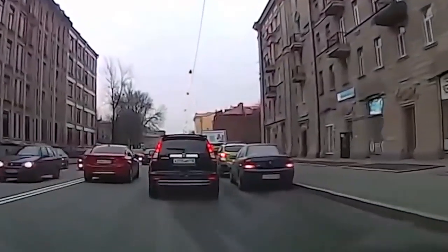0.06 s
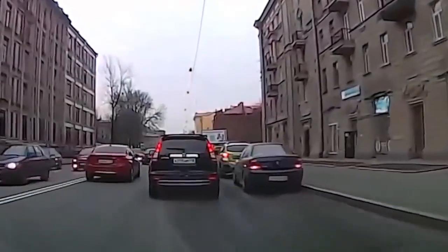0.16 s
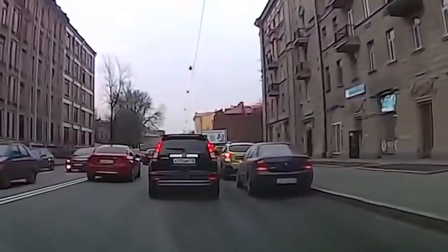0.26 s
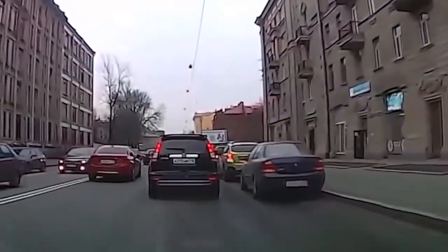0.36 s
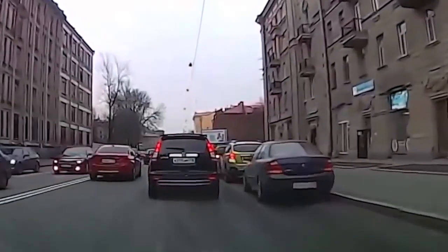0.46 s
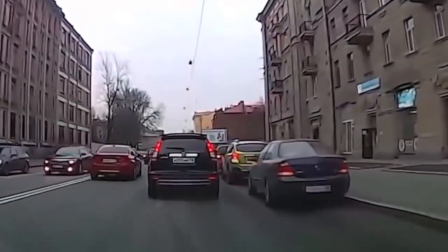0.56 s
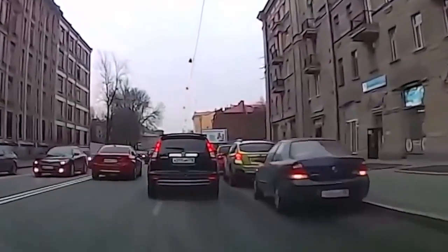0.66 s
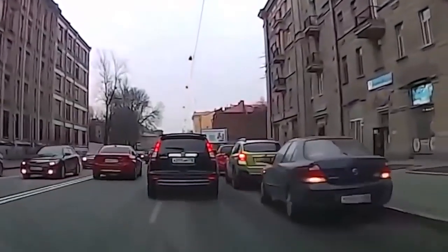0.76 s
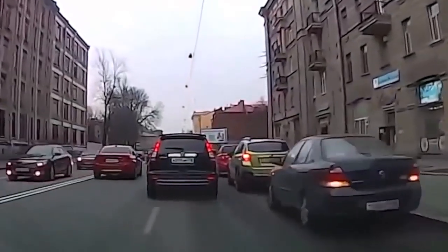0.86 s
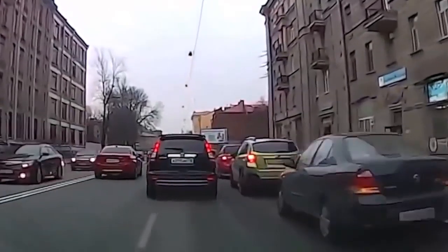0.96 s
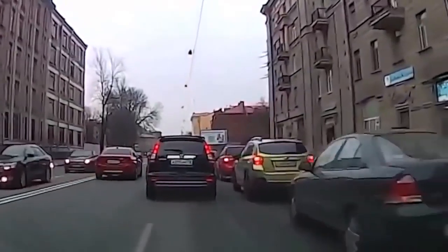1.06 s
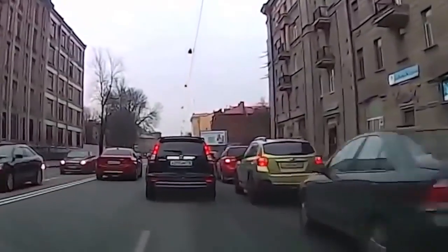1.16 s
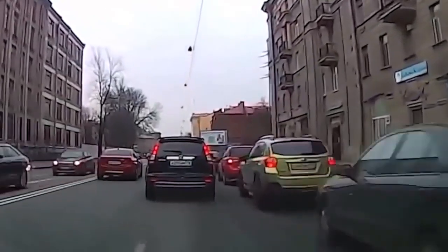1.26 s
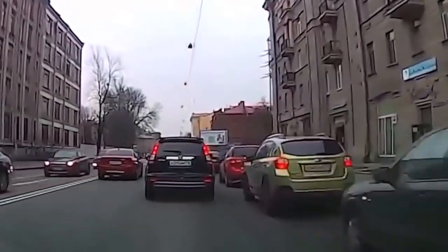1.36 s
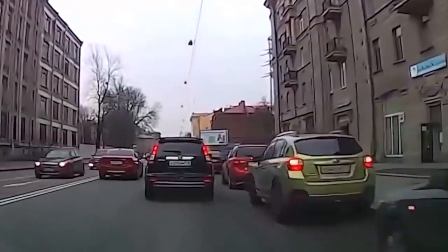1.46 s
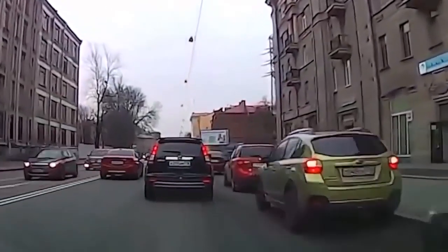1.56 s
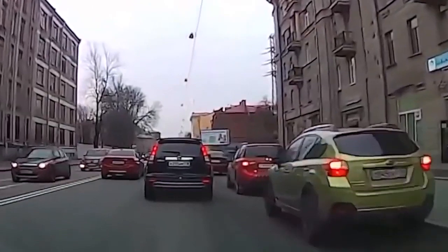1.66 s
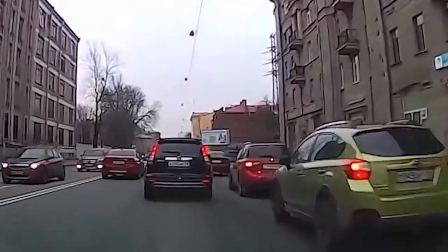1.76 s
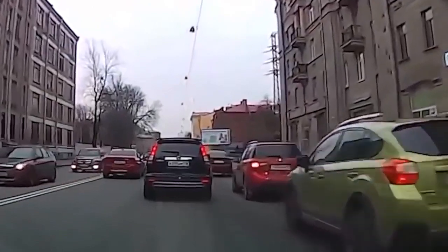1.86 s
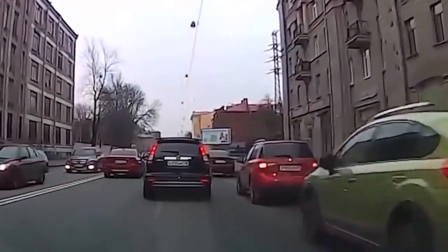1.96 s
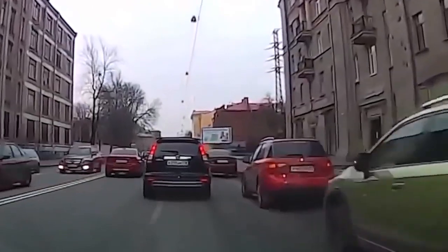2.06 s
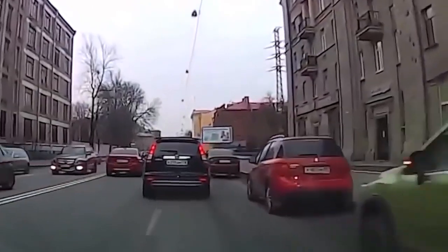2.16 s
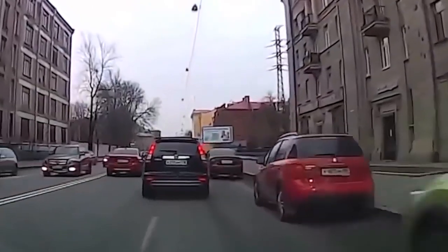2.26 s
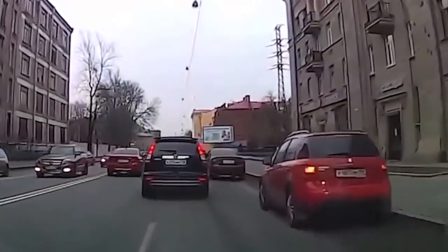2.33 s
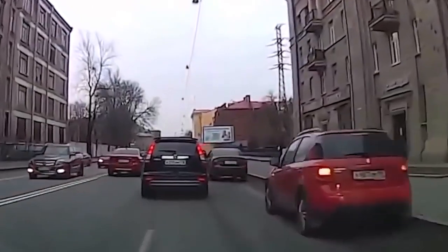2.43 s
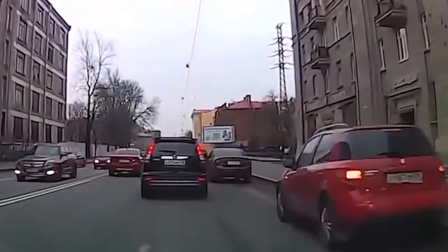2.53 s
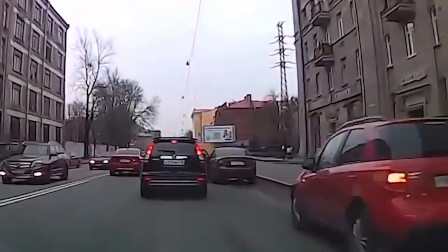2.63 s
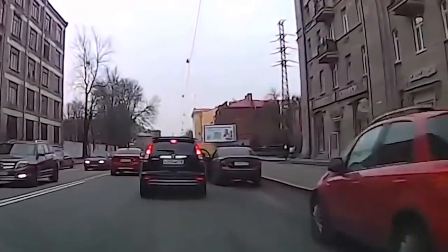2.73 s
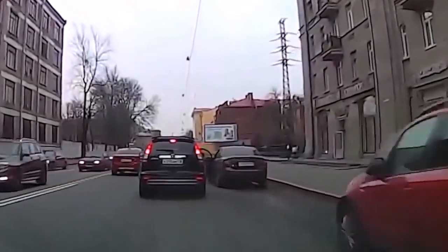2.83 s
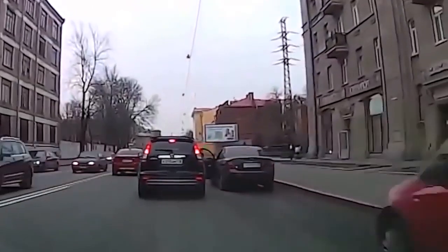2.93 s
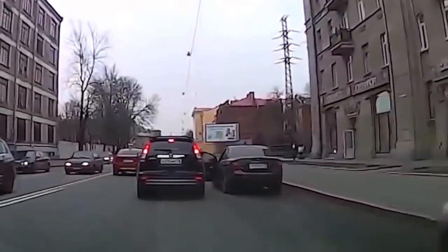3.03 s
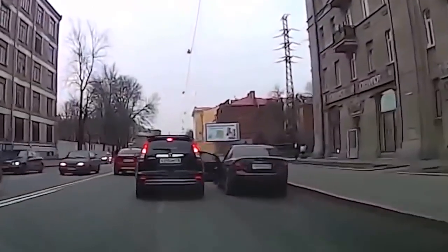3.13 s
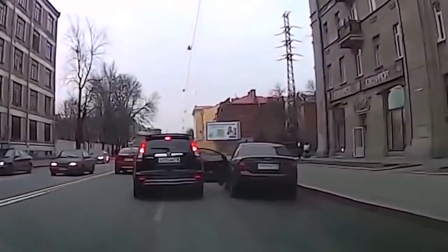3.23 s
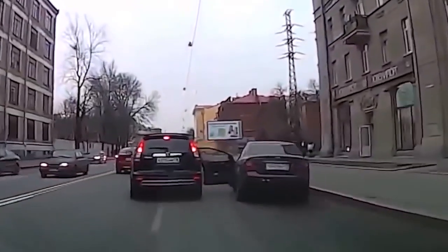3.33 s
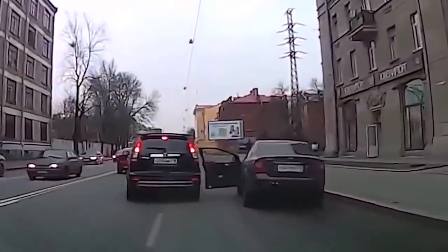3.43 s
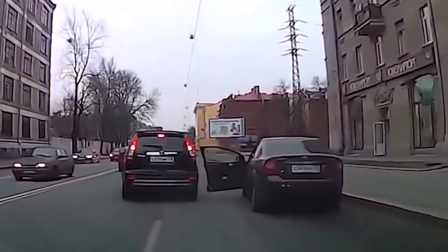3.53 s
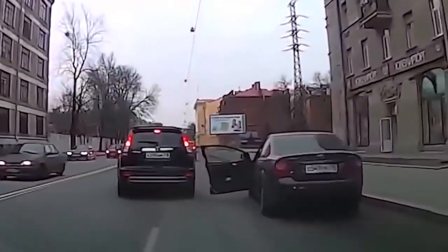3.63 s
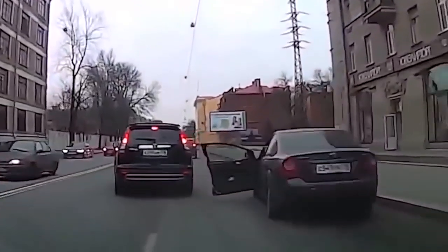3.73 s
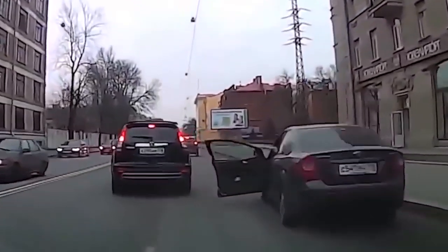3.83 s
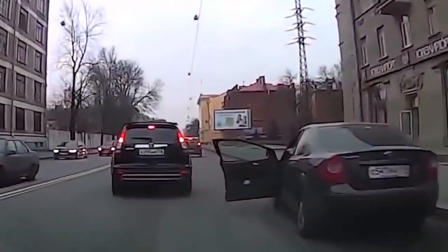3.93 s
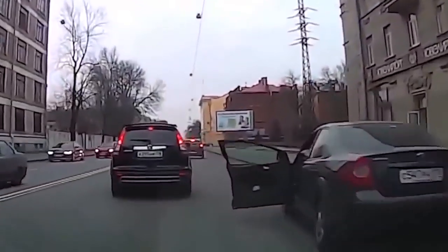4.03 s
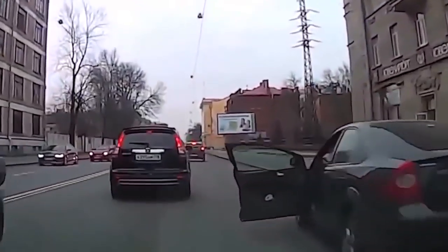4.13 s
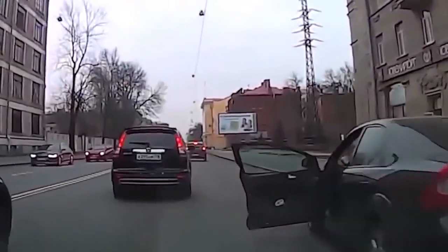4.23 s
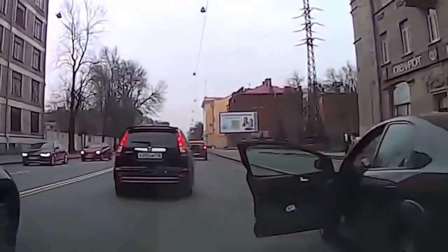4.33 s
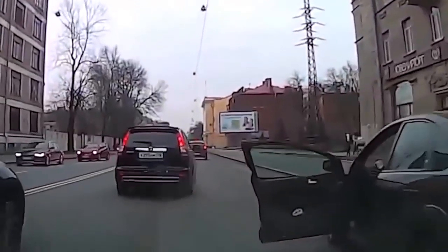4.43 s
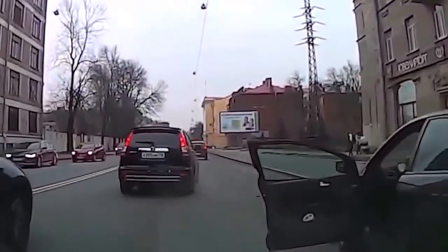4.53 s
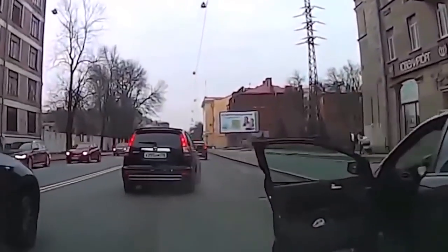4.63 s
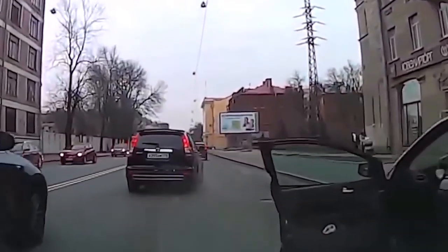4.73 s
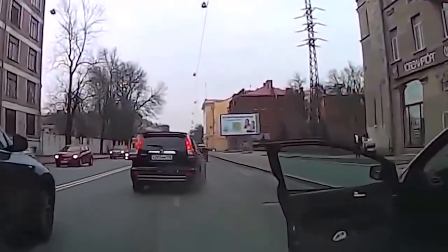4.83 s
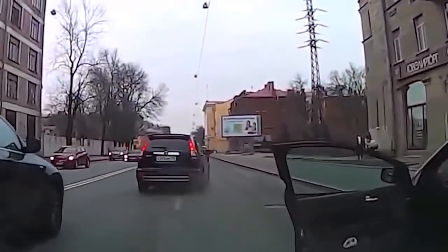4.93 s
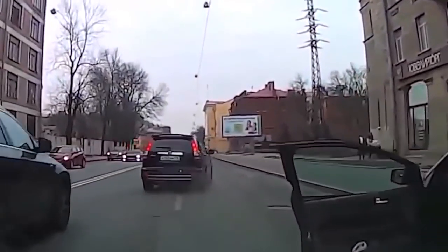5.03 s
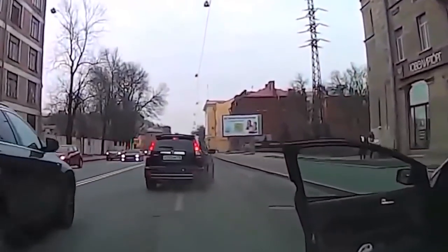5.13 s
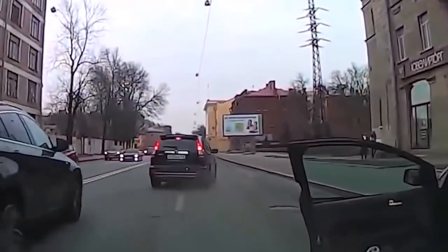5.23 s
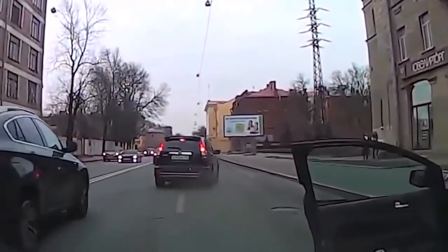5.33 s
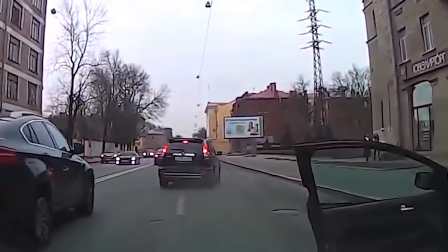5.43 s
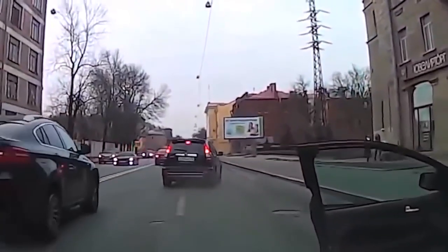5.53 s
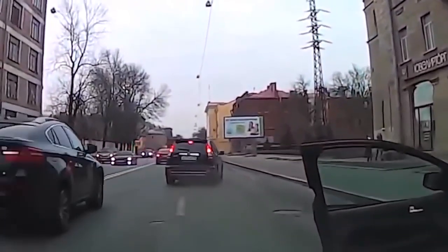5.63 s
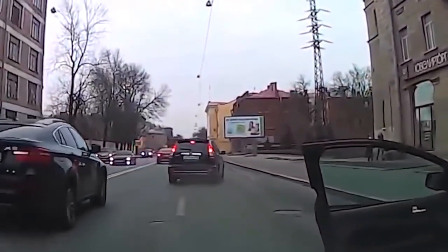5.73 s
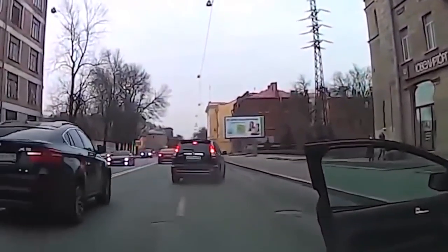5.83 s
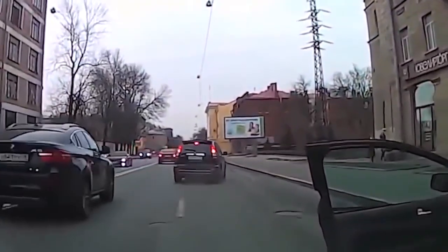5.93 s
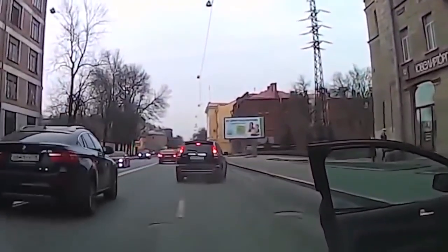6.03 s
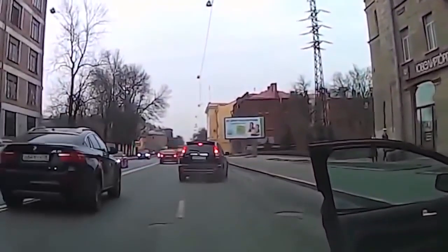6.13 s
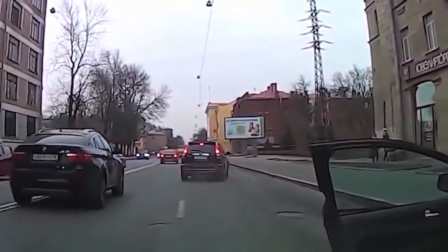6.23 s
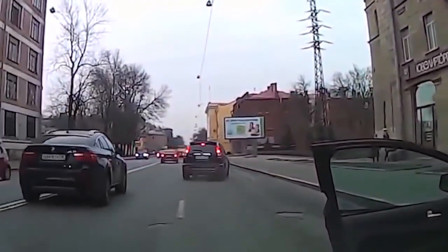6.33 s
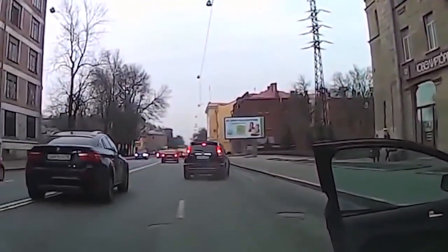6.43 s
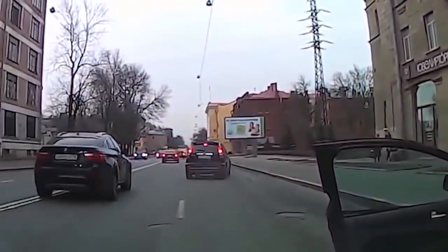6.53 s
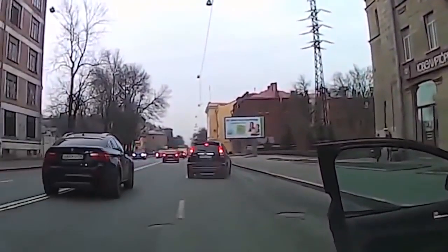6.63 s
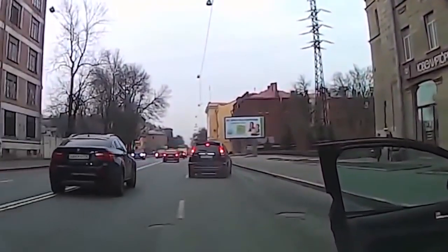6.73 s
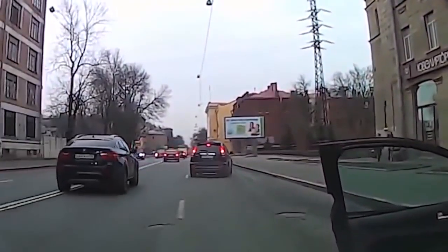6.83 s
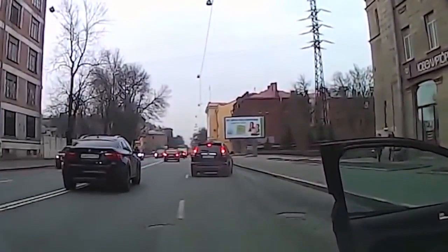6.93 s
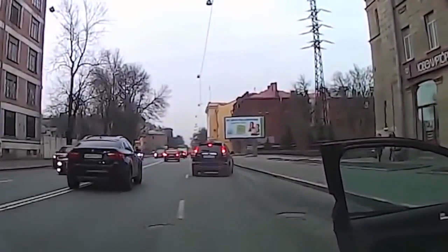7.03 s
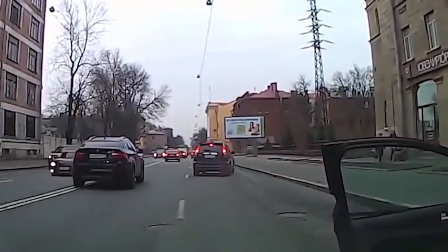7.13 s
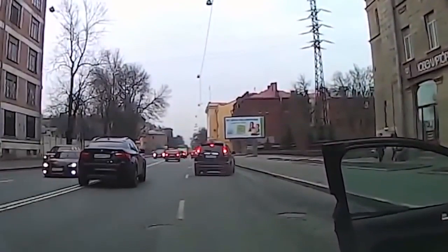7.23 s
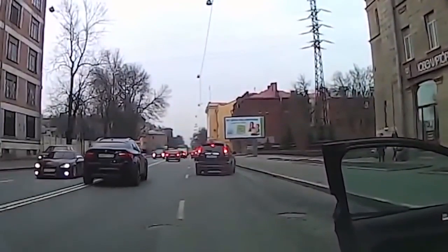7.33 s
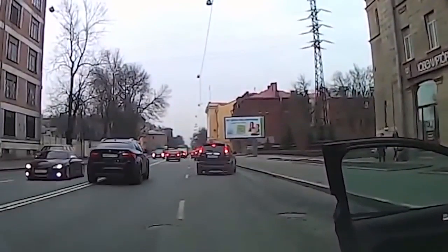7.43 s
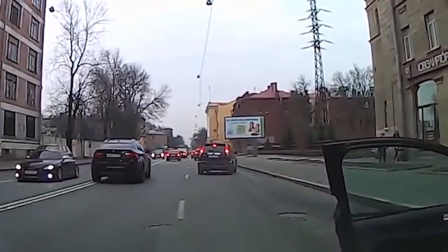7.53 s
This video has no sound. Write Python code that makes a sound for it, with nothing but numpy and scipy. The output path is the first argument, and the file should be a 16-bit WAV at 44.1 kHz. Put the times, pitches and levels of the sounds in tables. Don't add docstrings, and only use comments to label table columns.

```python
import sys
import numpy as np
from scipy import signal
from scipy.io import wavfile
from scipy.ndimage import uniform_filter1d

SR = 44100
rng = np.random.default_rng(int(sys.argv[2]) if len(sys.argv) > 2 else 0)


def store_wav(level_fs):
    pcm = np.round(np.clip(np.atleast_2d(level_fs), -1, 1) * 32767)
    wavfile.write(sys.argv[1], SR, pcm.T.astype(np.int16))


def level_to_linear(level):
    exponent = np.asarray(level, float) / 20
    return 10 ** exponent


N = 334133

# f/Hz, width/Hz, level/dB
PLASTIC = [(312, 130, 5), (561, 53, 6.5), (687, 65, -5.5), (920, 82, -4), (1163, 96, -8.5), (1553, 180, -2),
           (1860, 460, -11.5), (2836, 270, -12), (3340, 85, -17), (3920, 430, -37)]
# f/Hz, width/Hz, level/dB
CLIPS = [(4090, 430, 3.5), (5320, 1600, 2.5), (6110, 2100, -3.5), (8050, 580, -8.5)]


def rms_one(x):
    return x / np.sqrt(np.mean(x ** 2) + 1e-20)


def in_time(rows):
    s, *columns = np.transpose(rows)
    return [np.interp(np.arange(N) / SR, s, c) for c in columns]


def while_on(rows, fade=0.0087):
    t = np.arange(N) / SR
    return np.clip(np.minimum(t - rows[0][0], rows[-1][0] - t) / fade, 0, 1)


def drift(rate):
    r = np.exp(-80 * np.pi * rate / SR)
    chance = rng.standard_normal(N // 40 + 2002)
    slow = signal.lfilter([1], [1, -2 * r, r * r], chance)[2000:]
    return np.interp(np.arange(N) / 40, np.arange(len(slow)), rms_one(slow))


def lowpass(x, order, hz):
    return signal.sosfilt(signal.butter(order, hz, fs=SR, output="sos"), x)


def bandpass(x, order, low_hz, high_hz):
    return signal.sosfilt(signal.butter(order, [low_hz, high_hz], "band", fs=SR, output="sos"), x)


def resonate(x, hz, width_hz):
    r = np.exp(-np.pi * width_hz / SR)
    top = np.array([1, 0, -1]) * (1 - r * r) / 2
    return signal.lfilter(top, [1, -2 * r * np.cos(2 * np.pi * hz / SR), r * r], x)


def body(x, modes, widen=0.89):
    return [level_to_linear(db) * (-1) ** k * resonate(resonate(x, hz, widen * w), hz, widen * w) / np.sqrt(w)
            for k, (hz, w, db) in enumerate(modes)]


def bands(spectrum, patchy_db, step):
    hz, db = np.transpose(spectrum)
    edges = hz[0] * 2 ** np.arange(0, np.log2(hz[-1] / hz[0]), step)
    white, together = rng.standard_normal((2, N)), drift(14)
    for k, (low, high) in enumerate(zip(edges, edges[1:])):
        mid = np.sqrt(low * high)
        level_db = np.interp(np.log(mid), np.log(hz), db)
        gain = level_to_linear(level_db + patchy_db * (1.04 * together + drift(11)))
        yield mid, gain * bandpass(white[k % 2], 2, low, high)


def add(out, s, sound):
    i = round(s * SR)
    out[i:i + len(sound)] += sound[:N - i]


def knocks(table, t60, rise, crack_rise, crack_t60, partner=1.2, partner_db=-8):
    out, t = np.zeros(N), np.arange(SR // 6) / SR
    chance = rng.standard_normal((len(table), len(t)))
    upper = PLASTIC[3:]
    spot_db = rng.normal(0, 4, (len(table), len(upper)))
    for (s, peak_db, hz, crack_db, treble_db), noise, uneven_db in zip(table, chance, spot_db):
        ring = np.sin(2 * np.pi * hz * t) + level_to_linear(partner_db) * np.sin(2 * np.pi * partner * hz * t)
        ring *= -level_to_linear(-60 * t / t60) * (1 - np.exp(-t / rise))
        burst = noise * level_to_linear(-60 * t / crack_t60) * (1 - np.exp(-t / crack_rise))
        crack = level_to_linear(uneven_db) @ body(burst, upper, widen=1.7)
        tick = sum(body(burst, CLIPS))
        ring += level_to_linear(crack_db - 3.5) * crack / np.abs(crack).max()
        ring += level_to_linear(treble_db - 0.5) * tick / np.abs(tick).max()
        add(out, s, level_to_linear(peak_db) * ring)
    return out


def slides(table, per_s, widen, spread_db=0.0, uneven_db=3.0):
    attack_s, length_s, let_go_s = 0.026, 0.35, 0.31
    dulling_db_per_s = 8
    out, t = np.zeros(N), np.arange(round(length_s * SR)) / SR
    clicks = level_to_linear(spread_db * np.minimum(rng.exponential(1, N), 5)) * rng.choice([-1, 1], N)
    clicks = clicks * (rng.random(N) < per_s * level_to_linear(uneven_db * drift(30)) / SR) + 1e-18
    swell = np.clip(np.minimum(t / attack_s, (t[-1] - t) / let_go_s), 0, 1)
    steep_top = signal.cheby1(8, 1, 4350, fs=SR, output="sos")
    for s, peak_db, fade_db, bright_db, treble_db in table:
        own = clicks[round(s * SR):][:len(t)]
        tilt_db = bright_db - dulling_db_per_s * t
        panel = sum(level_to_linear(tilt_db * np.log2(mode[0] / 900)) * x
                    for mode, x in zip(PLASTIC, body(own, PLASTIC, widen)))
        panel = signal.sosfilt(steep_top, panel)
        treble = rms_one(sum(body(rng.standard_normal(len(t)), CLIPS)))
        both = rms_one(panel) + level_to_linear(treble_db + 3.0) * treble
        add(out, s, level_to_linear(peak_db - 4.5 - fade_db * np.maximum(t - attack_s, 0)) * swell * both)
    return out


def pings(t60=.03, rise=.002, rough=.55):
    # t/s, peak level/dB, f/Hz
    fittings = [(3.268, -53, 3750), (3.291, -36, 1560), (3.318, -38, 3900), (3.33, -29, 1580),
                (3.344, -28, 1560), (3.414, -36, 1580), (3.482, -30, 964), (3.554, -27, 2697),
                (3.726, -37, 3500), (3.732, -24, 460), (3.733, -16.5, 1270), (3.739, -38, 1800),
                (3.742, -39, 2700), (3.746, -16.5, 500), (3.747, -25.5, 1130), (3.759, -19, 494),
                (3.773, -21.5, 913), (3.777, -27, 1780), (3.787, -24.5, 3180), (3.79, -27, 1790),
                (3.802, -16, 1718), (3.808, -18.5, 1596), (3.802, -9, 585), (3.736, -18.5, 616),
                (3.805, -14.5, 1223), (3.809, -31, 3140), (3.816, -25, 2880), (3.843, -29, 1245),
                (3.847, -27.5, 2050), (3.881, -26.5, 1880), (3.884, -39.5, 4100), (3.935, -46, 6160),
                (3.97, -27.5, 2014), (3.971, -38, 3780), (4.018, -24.5, 920), (4.053, -26, 1520),
                (4.052, -32, 3440), (4.091, -27.5, 920)]
    out, t = np.zeros(N), np.arange(SR // 10) / SR
    chatter = uniform_filter1d(rng.standard_normal((len(fittings), len(t))), size=60, axis=1)
    for (s, peak_db, hz), shake in zip(fittings, chatter):
        swell = level_to_linear(peak_db + 2.5 - 60 * t / t60) * (1 - np.exp(-t / rise))
        add(out, s, swell * (1 + rough * rms_one(shake)) * np.sin(2 * np.pi * hz * t))
    return out


def loose_things():
    # t/s, peak level/dB, panel f/Hz, crack/dB, treble/dB
    dashboard = [(3.481, -23.5, 324, -39, -46), (3.555, -22.5, 523, -10, -30), (3.556, -21, 918, -7, -24),
                 (3.726, -18.5, 410, -4.5, -29), (3.731, -6.5, 600, -23, -54), (3.74, -14, 409, -8, -45),
                 (3.736, -12.5, 276, -5, -42), (3.746, -10, 342, -9.5, -41), (3.841, -23, 329, -10, -36),
                 (3.881, -47, 293, -6, -34), (3.97, -19.5, 322, -13, -39), (3.995, -22.5, 290, 0.5, -19.5),
                 (4.003, -16.5, 258, -1, -35), (4.023, -16, 362, -3, -24), (4.029, -22.5, 360, 2, -17),
                 (4.037, -15.5, 350, -1, -30), (4.051, -18.5, 337, -9, -40), (3.525, -29, 275, -6, -31),
                 (4.091, -16.5, 325, -7.5, -46)]
    # start t/s, peak level/dB, fade/dB per s, brightness/dB per octave, treble/dB
    long_slide = [
        (3.256, -28.5, 68, 3.5, -37),
        (3.47, -46.5, 84.5, -5, -49),
    ]
    rattles = [
        (3.82, -36.5, 69, 8, -15),
        (3.94, -31, 61.6, -0.5, -54),
        (4.01, -24, 94, -2.5, -34),
        (4.2, -52, 93, 6.5, -34),
        (4.325, -37.5, 112.4, 1.5, -36),
        (4.47, -29.5, 400, -6, -52),
        (4.70, -38.5, 119.8, 0, -49),
        (4.84, -45.5, 350, 3, -28),
    ]
    bang = [
        (3.7865, -24, 800, 0, -14),
        (3.7895, -16, 500, -5, -20),
        (3.8003, 9.5, 390, -26, -45),
        (3.8087, 8, 365, -25, -42),
        (3.8172, 5, 335, -30, -48),
    ]
    settling = [(0.239, -27.5, 363, -31, -50), (2.038, -29, 615, -24, -49), (2.12, -38, 269, -2, -51),
                (2.537, -25, 396, -13.5, -45), (4.324, -38, 250, -13, -28), (4.49, -25, 250, -31, -35),
                (4.714, -27, 337, -7.5, -52), (4.733, -31, 257.5, -33, -51), (5.053, -40, 1129, 2, -47),
                (5.3, -34, 1255, -19, -36), (5.542, -45.5, 570, 6.5, -41), (5.715, -42.5, 930, 1, -56),
                (5.811, -37.5, 1237, -2.5, -28), (6.079, -41, 632, -3.5, -26),
                (6.359, -49.5, 1200, 7.5, -8), (6.384, -48.5, 252, -21, -10), (6.455, -28.5, 658, -16, -45),
                (7.384, -42.5, 590, -1, -24)]
    debris = [(4.14, -34, 960, -5, -25), (4.167, -34, 1030, -3, -20), (4.203, -36, 1200, -1, -25),
              (4.22, -34, 1644, -10, -24), (4.238, -33.5, 960, -2, -19), (4.271, -35.5, 927, -6, -31),
              (4.306, -42, 1114, -5, -33), (4.345, -28, 960, -10, -32), (4.376, -36.5, 980, -6, -30),
              (4.408, -44, 870, -5, -30), (4.445, -39, 1000, -6, -21), (4.482, -33.5, 890, -1.5, -33),
              (4.525, -41.5, 1260, -6, -26), (4.574, -40, 1470, -3, -32), (4.629, -36.5, 1460, -5, -38),
              (4.777, -39.5, 1576, -2, -28), (4.848, -34.5, 912, -4, -30), (5.12, -39, 1640, -3.5, -31)]
    out = knocks(dashboard, t60=0.044, rise=0.0025, crack_rise=0.00011, crack_t60=0.021)
    out += slides(long_slide, 4000, widen=2.4) + slides(rattles, 900, widen=1.2)
    out += knocks(bang, t60=.019, rise=.003, crack_rise=.0008, crack_t60=.04, partner=1.4, partner_db=-9)
    out += knocks(settling, t60=.055, rise=0.0055, crack_rise=.009, crack_t60=0.08)
    out += knocks(debris, t60=0.048, rise=0.0038, crack_rise=0.0026, crack_t60=0.053) + pings()
    return lowpass(out, 6, 9700)


def cabin_echo(x, gain_db=-16):
    dull = bandpass(x, 1, 700, 3500)
    out = np.zeros(N)
    for lag, db in [(.0047, 4.5), (.0083, 4), (.0131, -18.5), (.019, -10.5), (.027, 0.5), (.038, -6.5)]:
        add(out, lag, level_to_linear(gain_db + db) * dull)
    return out


def grit(rise=0.006, flutter_db=2.5):
    scrapes = [
        (3.265, -49, 77),
        (3.39, -76, 88),
        (3.517, -52, 497),
        (3.553, -45, 1500),
        (3.727, -42, 602),
        (3.785, -41, 706),
        (3.8, -39.5, 603),
        (3.995, -45, 901),
        (4.026, -39, 601),
    ]
    t, swell = np.arange(N) / SR, 0
    for s, db, fade_db in scrapes:
        hold_s = .05 * (fade_db < 200)
        swell = swell + np.clip((t - s) / rise, 0, 1) * level_to_linear(db - fade_db * np.maximum(t - s - hold_s, 0))
    band = signal.cheby1(6, 1, [1800, 4350], "band", fs=SR, output="sos")
    return swell * level_to_linear(flutter_db * drift(37)) * rms_one(signal.sosfilt(band, rng.standard_normal(N)))


def bumps(table, rise, lift_db):
    out, t = np.zeros(N), np.arange(SR // 3) / SR
    for s, peak_db, hz in table:
        swell = level_to_linear(peak_db + lift_db - 60 * t / 0.054) * (1 - np.exp(-t / rise))
        add(out, s, swell * np.sin(2 * np.pi * hz * t))
    return out


def floor_pushes():
    # t/s, peak level/dB, f/Hz
    suspension = [(0.435, -13, 190), (1.194, -5.5, 195), (2.029, -10.5, 187), (3.732, -7, 123),
                  (3.801, 7.5, 202), (4.016, 9, 117), (4.485, 0, 92), (4.747, -4.5, 92), (5.039, -16, 102),
                  (5.132, -12, 109.5), (5.152, -17.5, 254), (5.199, -9.5, 97), (6.381, -12.5, 108),
                  (6.451, -8.5, 102.6), (6.542, -18, 103), (5.756, -28, 126), (5.894, -24, 130),
                  (6.621, -25, 90.2), (6.67, -24, 82), (6.809, -29, 102), (6.901, -29, 70.9),
                  (7.178, -46, 72), (7.531, -29.5, 66.4)]
    # t/s, peak level/dB, f/Hz
    shudders = [(3.29, -20, 202), (3.97, -23.5, 200), (4.05, -20, 200), (4.1, -21, 136), (4.193, -24, 113),
                (4.265, -28, 121), (4.324, -18, 111), (4.39, -26, 110), (4.43, -28, 120), (4.54, -28, 105),
                (4.6, -30, 100), (4.66, -34, 109.4), (4.77, -28, 198), (4.82, -30, 101), (4.88, -35, 132),
                (4.94, -37, 102.5)]
    return bumps(suspension, rise=0.012, lift_db=-8.5) + bumps(shudders, rise=0.022, lift_db=10.5)


def brake_groan(rows, rough=.6, wander_hz=4.0):
    hz, level_db = in_time(rows)
    second_db = -13 + 9 / (1 + ((2 * hz - 239) / 23) ** 2)
    phase = 2 * np.pi * np.cumsum(hz + wander_hz * drift(30)) / SR
    tone = np.sin(phase) + level_to_linear(second_db) * np.sin(2 * phase)
    return while_on(rows, 0.13) * level_to_linear(level_db - 0.5) * tone * (1 + rough * np.tanh(drift(17)))


def brakes():
    # t/s, f/Hz, level/dB
    spells = [
        [(3.9, 139, -31), (4.044, 134.6, -24.5), (4.14, 134, -28), (4.19, 115.3, -31.5), (4.406, 119.5, -32),
         (4.516, 114.2, -38), (4.6, 103.1, -45.5), (4.8, 109.1, -44.5), (4.95, 108, -54)],
        [(5.08, 97.2, -74), (5.152, 99.9, -34), (5.278, 102.4, -47.5), (5.504, 100.5, -53.5), (5.7, 103, -76)],
        [(6.3, 97.3, -62), (6.5, 102.5, -50), (6.68, 91.7, -56), (6.75, 92.3, -75), (6.85, 96.8, -57.5),
         (7.0, 79.6, -73)],
    ]
    return sum(brake_groan(rows) for rows in spells)


def squeaks(flutter_db=7.5):
    whispers = [
        (4.363, 4.465, -71.5),
        (4.806, 4.847, -72),
        (4.949, 5.019, -69.5),
        (5.137, 5.174, -83),
        (5.413, 5.595, -77),
    ]
    hz, width_hz = 4050, 380
    noise = resonate(resonate(rng.standard_normal(N), hz, width_hz), hz, width_hz)
    gate = sum(level_to_linear(db) * while_on([[on], [off]], 0.013) for on, off, db in whispers)
    return gate * level_to_linear(flutter_db * drift(28)) * rms_one(noise)


def road():
    # f/Hz, level/dB per Hz
    rolling = [(13, -42), (22, -0.5), (48, 2), (119, 7.5), (155, -2), (193, -6), (372, -8), (473, -14.5),
               (589, -6), (717, -7.5), (1110, -14.5), (1540, -19), (2050, -38.5), (2670, -52.5),
               (4140, -88.5), (5380, -94), (9110, -120)]
    # f/Hz, width/Hz, level/dB
    cabin = [(186, 28, 5), (712.5, 110, -24.5), (1570, 35, 7.5), (2080, 420, -16.5), (2607, 138, 9.5)]
    # t/s, level/dB against cruising
    roll = [(0, 1), (.3, 1.5), (.55, 1), (.95, 0.5), (1.2, 2), (1.55, 1), (1.9, 3.5), (2.4, 2), (2.7, 3),
            (3.3, 3), (3.65, 2.5), (4.4, -4), (4.65, -15), (5.2, -14), (5.6, -20), (6.0, -31),
            (7.58, -33.5)]
    layers = [
        (-45, -34, 25, -80),
        (-44.5, -41.5, 80, -69),
        (-46.5, -45, 38, -61),
    ]
    brake_on_s, brake_full_s, brake_ease_s = 3.76, 3.94, 4.426
    parts, t = np.zeros((3, N)), np.arange(N) / SR
    for hz, band in bands(rolling[1:-2], patchy_db=1.5, step=1 / 3):
        parts[np.searchsorted([160, 480], hz)] += band
    roll_db = in_time(roll)[0]
    pedal = np.clip((t - brake_on_s) / (brake_full_s - brake_on_s), 0, 1)
    out = 0
    for part, (cruise_db, brake_db, release_db, still_db) in zip(parts, layers):
        braking = pedal * level_to_linear(brake_db - release_db * np.maximum(t - brake_ease_s, 0))
        still = level_to_linear(still_db + 2.5 * drift(2))
        level = np.sqrt(level_to_linear(cruise_db + roll_db) ** 2 + braking ** 2 + still ** 2)
        out = out + level * rms_one(part)
    for hz, width_hz, db in cabin:
        out = out + (level_to_linear(db) - 1) * resonate(out, hz, width_hz)
    return lowpass(out, 4, 3700)


def street():
    # f/Hz, level/dB per Hz
    traffic = [(300, -0.5), (450, 3), (650, -4.5), (750, -5.5), (900, 4.5), (1500, 4.5), (2050, -13),
               (2500, 3), (3000, -21.5), (3400, -31.5), (3900, -42), (4500, -38), (4800, -50)]
    # t/s, swell/dB, half-length/s
    passes = [
        (2.397, -1, .3),
        (3.47, 8, 0.15),
        (6.194, 2.5, 0.082),
        (6.433, 4.5, 0.39),
        (6.857, 2.5, 0.053),
    ]
    noise = sum(band for hz, band in bands(traffic, patchy_db=1.8, step=1 / 5))
    t = np.arange(N) / SR
    near_db = sum(db * np.exp(-((t - s) / half) ** 2) for s, db, half in passes)
    skid_s, skid_db, rise_db_per_s, fade_db_per_s = 3.926, -45.5, 56, 26
    scrub_db = skid_db - np.maximum(rise_db_per_s * (skid_s - t), fade_db_per_s * (t - skid_s))
    return np.hypot(level_to_linear(-66.5 + near_db), level_to_linear(scrub_db)) * level_to_linear(7.5) * rms_one(noise)


def electronics():
    # f/Hz, level/dB per Hz
    treble = [(4700, -26), (5200, -6), (6000, 6.5), (6600, -1.5), (7000, -2), (7600, -5), (8300, 7.5),
              (9300, -5.5), (9900, -17.5)]
    # start/share of frame, end/share of frame, level/dB above hiss
    bursts = [
        (.29, .41, 7),
        (.47, .57, 7),
        (.63, .68, 4),
    ]
    # on t/s, off t/s
    whine_spans = [
        (0, .8),
        (.88, 1.1),
        (1.39, 1.43),
        (3.1, 3.16),
        (3.53, 3.7),
        (3.88, 3.94),
        (4.54, 7.6),
    ]
    # on t/s, off t/s, extra depth/1
    on, off, extra = (2.93, 3.47, 0.84)
    t = np.arange(N) / SR
    place = t * 28.465 % 1
    depth = 1.24 - 0.078 * t + extra * while_on([[on], [off]])
    lift_db = sum(db * ((place > a) & (place < b)) for a, b, db in bursts) * depth
    hiss = rms_one(sum(band for hz, band in bands(treble, patchy_db=.8, step=1 / 9)))
    narrow = rms_one(bandpass(rng.standard_normal(N), 3, 10800, 11350))
    whine = level_to_linear(-92.5 + 2.5 * drift(20) + lift_db / 2) * narrow
    whine = whine * sum(while_on([[a], [b]]) for a, b in whine_spans)
    return level_to_linear(-74 - 4.5) * hiss * level_to_linear(uniform_filter1d(lift_db, size=20)) + whine


def scene():
    loose = loose_things()
    inside = loose + cabin_echo(loose) + grit() + floor_pushes() + brakes() + squeaks()
    return (inside + road() + street() + electronics())[None]


def coarse_steps(x, size=576, masking=.15, dead_db=-11, uneven_db=2.4):
    # f/Hz, level/dB
    rounding = [(30, -48), (150, -41), (500, -37), (1000, -39), (2100, -51), (2600, -47), (3300, -61),
                (4000, -60), (5000, -63), (6500, -64), (8300, -71), (10000, -72), (11000, -76),
                (13000, -76)]
    n, k = np.arange(2 * size)[:, None], np.arange(size)
    window = np.sin(np.pi * (n + .5) / (2 * size))
    basis = np.sqrt(2 / size) * window * np.cos(np.pi / size * (n + .5 + size / 2) * (k + .5))
    count = N // size + 3
    halves = np.pad(x, (size, count * size - N - size)).reshape(count, size)
    lines = np.hstack([halves[:-1], halves[1:]]) @ basis
    hz, db = np.transpose(rounding)
    loud_db = 10 * np.log10(np.mean(lines ** 2, axis=1, keepdims=True) + 1e-9) + 48
    line_hz = (k + .5) * SR / 2 / size
    step = level_to_linear(np.interp(np.log(line_hz), np.log(hz), db) + masking * loud_db)
    spare = uniform_filter1d(rng.standard_normal((count - 1, size // 8)), size=3, axis=0)
    step = step * level_to_linear(uneven_db * np.sqrt(3) * spare.repeat(8, axis=1))
    group = np.mean(((lines / step) ** 2).reshape(count - 1, -1, 4), axis=2).repeat(4, axis=1)
    blocks = (step * np.round(lines / step) * (group > level_to_linear(2 * dead_db))) @ basis.T
    return (blocks[:-1, size:] + blocks[1:, :size]).ravel()[:N]


def top_cut(x):
    return signal.sosfilt(signal.butter(12, 15500, fs=SR, output="sos"), x)


def record(dry):
    stored = coarse_steps(dry[0]) + level_to_linear(-91) * rng.standard_normal(N)
    return top_cut(stored[None])


dry = scene()
out = record(dry)
store_wav(out)
```